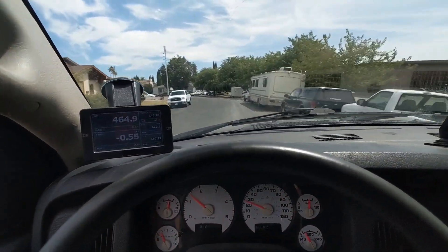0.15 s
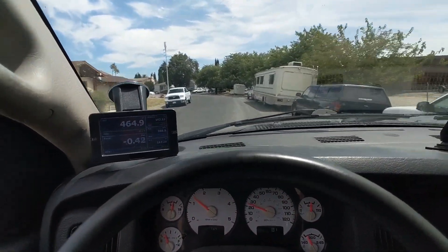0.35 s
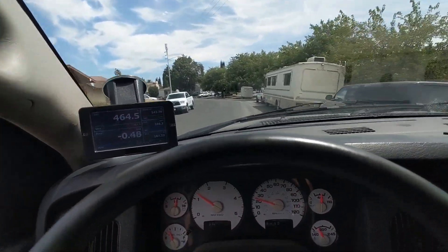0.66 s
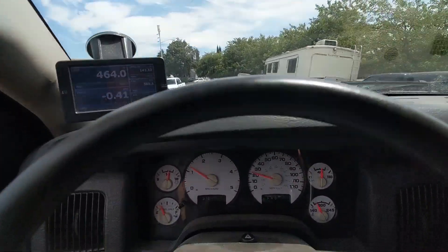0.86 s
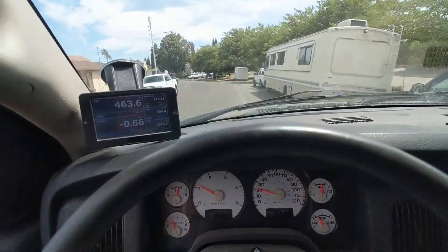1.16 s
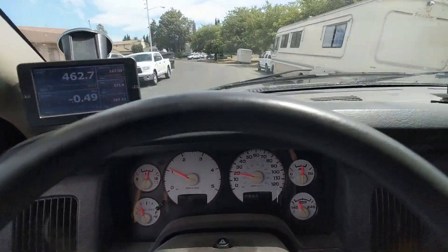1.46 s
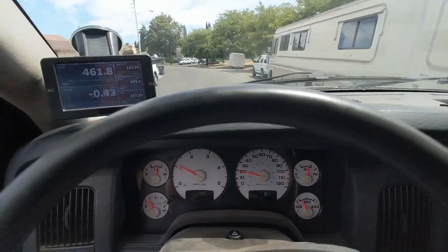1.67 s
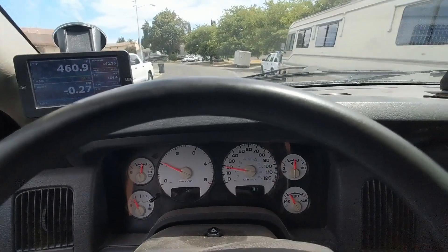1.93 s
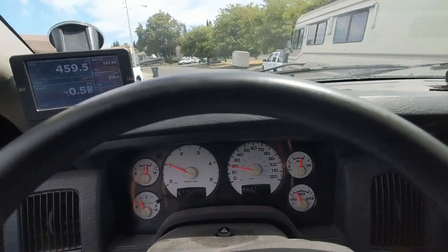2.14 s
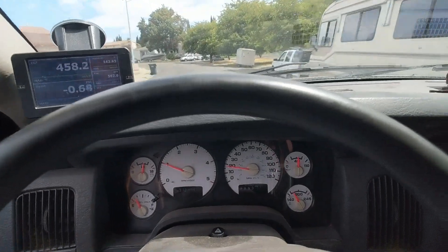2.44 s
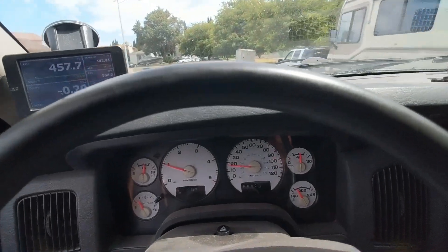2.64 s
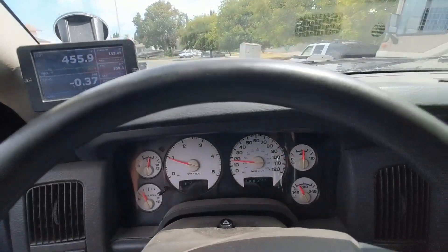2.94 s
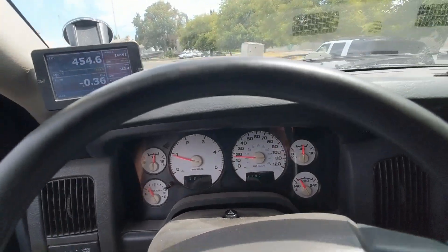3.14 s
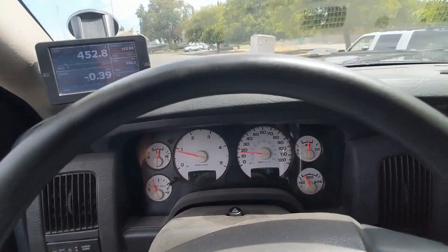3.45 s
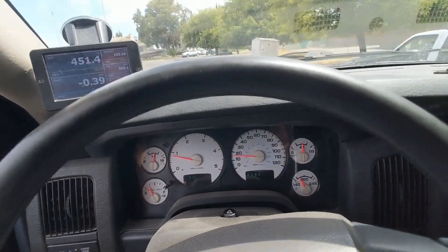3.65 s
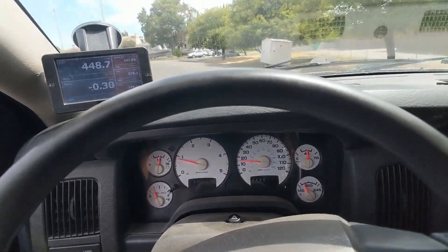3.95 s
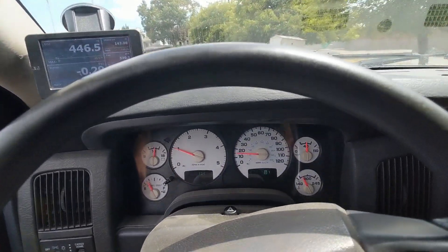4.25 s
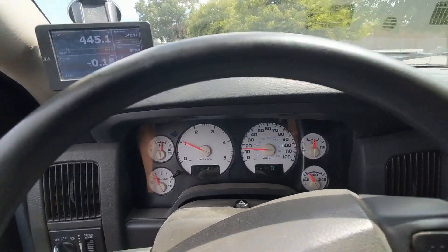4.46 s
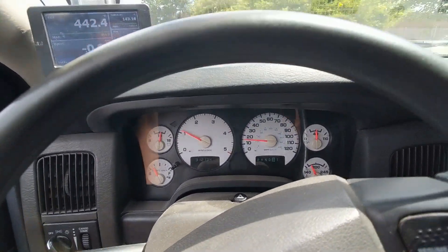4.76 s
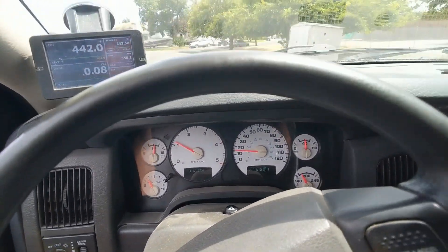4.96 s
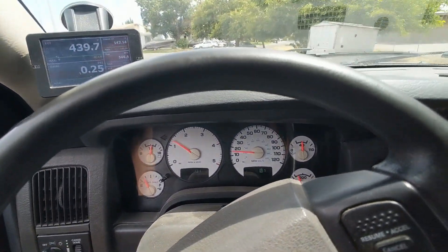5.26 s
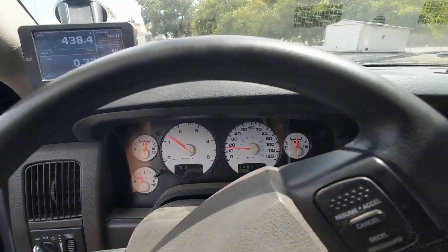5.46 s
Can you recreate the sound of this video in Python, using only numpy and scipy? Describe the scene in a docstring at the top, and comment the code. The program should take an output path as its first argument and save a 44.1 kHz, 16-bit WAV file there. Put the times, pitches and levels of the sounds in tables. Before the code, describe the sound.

A turbodiesel truck heard from the cab slows with a throbbing drone and dashboard ticks, puffs air, then pulls away louder as revs climb.

```python
"""Inside the cab of a six-cylinder turbodiesel pickup rolling down a street. First the exhaust brake
drones and throbs as the revs fall, over injection clatter, duct hiss and tyre rumble. The trim ticks
and knocks; bumps jolt the cab. Near 3 s the brake flap opens with a hiss of trapped gas. From 3.5 s
the revs climb: the turbo whistle rises and the firing note booms in the cab."""
import sys
import numpy as np
from scipy import signal
from scipy.fft import rfft, irfft, next_fast_len
from scipy.io import wavfile
from scipy.ndimage import uniform_filter1d, map_coordinates

SR = 44100
rng = np.random.default_rng(int(sys.argv[2]) if len(sys.argv) > 2 else 0)


def store_pcm(level_fs):
    """Save levels as 16-bit WAV."""
    pcm = np.round(np.clip(level_fs, -1, 1) * 32767).astype(np.int16)
    wavfile.write(sys.argv[1], SR, np.atleast_2d(pcm).T)


N = 246959

# engine speed: time_s, firing_hz
FIRING_RATE = [(0, 68), (.9, 60.2), (1.5, 54.5), (2.1, 51.6), (2.7, 47.2), (3, 45.8), (3.5, 40.5),
               (3.75, 41.9), (4, 44.8), (4.25, 51.9), (4.75, 57.8), (5.25, 65.1), (5.6, 68.3)]
# throttle: time_s, fuel_share
THROTTLE = [(2.7, 0.069), (3.2, 0.32), (3.65, .66), (4.4, 0.95), (4.8, 0.95), (5.2, 0.48), (5.6, 0.39)]
# pulses in firing order; the shut flap loads the manifold halves unevenly: relative_strength
BRAKE_PULSES = [1, .03, .72, .08, .72, 0]
BUZZ_PULSES = [0.14, -0.66, 0.39, 0.2, 0.51, -0.59]
PULL_PULSES = [0.4, 0.47, 0.79, 0.42, 1.1, 0.37]
# pipe and cab response, flap shut and open: freq_hz, gain_db
PIPE_SHUT = [(30, -50), (65, -34), (100, -22), (128, -17), (144, -7.5), (157, -2.5), (170, 1), (184, 1.5),
             (199, -5), (213, -15), (245, -27), (400, -52)]
PIPE_OPEN = [(30, -25), (60, -11), (90, -7), (125, -11), (150, -.5), (175, 2), (215, -1.5), (245, -11),
             (270, -11), (305, -17), (380, -26), (600, -47)]
# flap response: freq_hz, gain_db
FLAP_RESPONSE = [(200, -32), (245, -15.5), (275, -1.5), (298, 2.5), (322, 0), (345, -13), (390, -20),
                 (520, -35.5)]
# cab boom, flap shut and open: freq_hz, level_db
BOOM_SHUT = [(50, -49), (57, -34.5), (61, -23), (63.5, -22.5), (66, -35), (92, -30.5), (104, -53),
             (124, -55), (135, -32.5)]
BOOM_OPEN = [(44, -44), (52, -26.5), (58, -18), (64, -9.5), (68, -9), (80, -31.5), (88, -22.5),
             (102, -21.5), (118, -32.5), (135, -27.5)]
# glass and roof reflections: delay_s, gain
CAB_ECHOES = [(.0029, .13), (.0047, -.12), (.0074, .12), (.0113, .1)]
# noise spectra: freq_hz, gain_db
COMBUSTION_SPECTRUM = [(220, -23.5), (380, -1), (465, -6.5), (585, -0.5), (625, -3), (706, -5), (760, -1),
                       (924, -4.5), (1000, -4.5), (1110, -2.5), (1230, -4.5), (1510, -9.5), (1900, -17.5),
                       (2470, -33), (4180, -120)]
INJECTOR_SPECTRUM = [(940, -16.5), (1600, -1.5), (1890, -6.5), (2060, -2.5), (2400, -4.5), (2770, -2),
                     (3280, -9.5), (3800, -10.5), (4760, -13), (5600, -34), (7280, -47), (12300, -120)]
DUCT_SPECTRUM = [(2820, -8.5), (4800, -1.5), (5540, -3), (7700, -4.5), (8670, -8), (10100, -7.5),
                 (11300, -15), (15100, -21), (15600, -20)]
TYRE_SPECTRUM = [(20, -46.5), (42, -7.5), (70, 0), (120, -8), (180, -0.5), (250, -10.5), (330, -22.5),
                 (450, -26), (800, -45.5)]
# duct hiss contour: time_s, relative_db
DUCT_CONTOUR = [(0.0, -53), (0.69, -55.5), (1.0, -51), (2.51, -55), (2.92, -46), (3.02, -46), (3.21, -53),
                (3.52, -51.5), (3.76, -49), (4.85, -51.5), (5.08, -54.5), (5.6, -54.5)]
# road bumps: peak_s, level_db, half_width_s
BUMPS = [(1.08, -27, .06), (1.43, -19.5, .055), (1.6, -27, .1)]
# plastic squeaks: start_s, level_db, pitch_hz
SQUEAKS = [(.315, -50, 12000), (.803, -45, 12150), (1.097, -40, 8300), (2.182, -48, 11200)]
# dashboard ticks and creaks: start_s, level_db, centre_hz, t60_s
DASH_TICKS = [(0.408, -33.5, 880, 0.072), (.975, -33, 2020, 0.17), (0.985, -38.5, 6900, 0.059),
              (1.055, -29, 800, .3), (1.39, -27.5, 560, .16), (1.57, -45, 6900, 0.28),
              (1.69, -40, 6700, .12), (1.812, -42, 10000, 0.046), (2.238, -39, 7500, 0.027),
              (2.52, -35.5, 2470, .09), (2.78, -34.5, 616, .4), (3.207, -39, 7500, 0.067),
              (3.467, -33.5, 4960, .04), (4.12, -41, 8450, .4)]
# panel knocks: start_s, gain_db
PANEL_KNOCKS = [(.806, -36.5), (.99, -35), (1.005, -35), (1.122, -37), (1.534, -32.5), (2.1238, -21)]
# panel modes: pitch_hz, gain_db, t60_s
PANEL_MODES = [(694, 1, 0.056), (767, 2, .04), (866, -1, 0.056), (1476, -2, 0.026), (1710, -2.5, 0.035),
               (2340, -6.5, 0.041), (2590, -12, 0.049), (3190, -6.5, 0.028), (4000, -8, 0.027),
               (7090, -14, 0.031)]
# gas past the flap (jet, whistling edge, gush): start_s, hold_s, level_db, centre_hz, width_hz
GAS_PUFFS = [(2.828, .15, -44, 6300, 8000), (2.83, .33, -44.5, 6300, 1600),
             (2.955, .035, -35.5, 2920, 3020)]

FLAP_OPENS_S, FLAP_SWING_S = 2.985, .04
CRUISE_FIRING_HZ = 55
TIME_S = np.arange(N) / SR
LN_1000 = np.log(1000)  # 60 dB of decay


def amp(db):
    """Decibels to gain."""
    return 10 ** (np.asarray(db) / 20)


def unit(x):
    """x at rms 1."""
    return x / np.sqrt(np.mean(x ** 2) + 1e-20)


def curve(rows):
    """(time_s, value) rows to one value per sample."""
    return np.interp(TIME_S, *np.transpose(rows))


def wobble(rate_hz):
    """Smooth random curve with knots at rate_hz."""
    return map_coordinates(rng.standard_normal(int(N * rate_hz / SR) + 4), [TIME_S * rate_hz])


def filtered(x, response):
    """x times a complex frequency response."""
    size = 2 * next_fast_len(N // 2 + SR // 4)
    return irfft(rfft(x, size) * response(np.fft.rfftfreq(size, 1 / SR)), size)[:N]


def coloured(x, spectrum):
    """Causal filter, falling 40 dB per octave beyond the spectrum's ends; rms 1."""
    def response(hz):
        knot_hz, gain_db = np.transpose(spectrum)
        octave, knots = np.log2(hz + 1), np.log2(knot_hz)
        beyond = np.abs(octave - np.clip(octave, knots[0], knots[-1]))
        gain = amp(np.interp(octave, knots, gain_db) - 40 * beyond)
        cepstrum = irfft(np.log(gain + 1e-6))
        return np.exp(rfft(2 * cepstrum[:len(cepstrum) // 2], len(cepstrum)))
    return unit(filtered(x, response))


def noise(spectrum):
    """Coloured noise, rms 1."""
    return coloured(rng.standard_normal(N), spectrum)


def band(centre_hz, width_hz):
    """Noise through a damped mode twice, rms 1."""
    def mode(hz):
        return 1j * hz * width_hz / (centre_hz ** 2 - hz ** 2 + 1j * hz * width_hz)
    return unit(filtered(rng.standard_normal(N), lambda hz: mode(hz) ** 2))


def burst(start_s, rise_s, t60_s):
    """Envelope that swells and dies away."""
    age_s = np.arange(SR // 2) / SR
    shape = (1 - np.exp(-age_s / rise_s)) * np.exp(-LN_1000 * age_s / t60_s)
    return np.pad(shape, (int(start_s * SR), N))[:N]


def level(base_db, fuel_db=0, octave_db=0):
    """Gain: base_db unfuelled at cruise, plus fuel_db at full throttle, octave_db per rev doubling."""
    octaves = np.log2(curve(FIRING_RATE) / CRUISE_FIRING_HZ)
    return amp(base_db + fuel_db * curve(THROTTLE) + octave_db * octaves)


def cab(x):
    """Close reflections add a boxed-in colour; rms 1."""
    def response(hz):
        return 1 + sum(gain * np.exp(-2j * np.pi * hz * delay_s) for delay_s, gain in CAB_ECHOES)
    return unit(filtered(x, response))


def exhaust(firings, pulses, response, scatter, jitter):
    """One gas pulse per firing, varied in size and timing, rings the response; level held steady."""
    index = np.arange(np.ceil(firings[0]), np.floor(firings[-1]))
    chance = rng.standard_normal((len(index), 2))
    sizes = np.array(pulses)[index.astype(int) % len(pulses)] + scatter * chance[:, 0]
    onsets = np.interp(index + jitter * chance[:, 1], firings, np.arange(N)).astype(int)
    ring = coloured(np.bincount(onsets, sizes, N), response)
    power = uniform_filter1d(uniform_filter1d(ring ** 2, size=SR // 4), size=SR // 4)
    return ring / np.sqrt(np.abs(power))


def cab_boom(firings, response):
    """The firing note and its octave swell as the revs cross the cab's resonances."""
    def tone(harmonic):
        level_db = np.interp(harmonic * curve(FIRING_RATE), *np.transpose(response))
        return amp(level_db) * unit(np.cos(2 * np.pi * harmonic * (firings - .3)))
    return amp(.51 * wobble(21)) * tone(1) + amp(2.1 * wobble(13)) * tone(2)


def exhaust_brake(firings, flap_open, bleed_db=-10.5, bleed_s=.32):
    """Uneven pulses drone in the pipe and buzz the flap; once it opens, the drone bleeds away."""
    drone = exhaust(firings, BRAKE_PULSES, PIPE_SHUT, scatter=.05, jitter=.005)
    drone *= level(-18.5, octave_db=4.8)
    buzz = exhaust(firings, BUZZ_PULSES, FLAP_RESPONSE, scatter=.1, jitter=.007)
    buzz *= level(-28.5, octave_db=13)
    braking = drone + buzz + cab_boom(firings, BOOM_SHUT)
    bleed = amp(bleed_db) * np.exp(-((TIME_S - FLAP_OPENS_S) / bleed_s) ** 4)
    return (1 - flap_open) * braking + flap_open * bleed * drone


def clatter(firings, scatter_db=6.5, max_db=13.5, dip_s=2.26, dip_half_width_s=.29, dip_db=-3):
    """Combustion knock and injector rattle flare unevenly at each firing; the level dips briefly."""
    strength_db = np.minimum(scatter_db * rng.standard_normal(int(firings[-1]) + 1), max_db)
    flare = amp(strength_db)[firings.astype(int)] * np.exp(-(firings % 1) / .62)
    combustion = unit(1 + .14 * flare) * cab(noise(COMBUSTION_SPECTRUM))
    injectors = unit(1 + .33 * flare) * cab(noise(INJECTOR_SPECTRUM))
    combustion *= level(-41.5, fuel_db=6.76) * amp(1.1 * wobble(32))
    injectors *= level(-47, fuel_db=7.4, octave_db=-6.5)
    dip = amp(dip_db * np.exp(-((TIME_S - dip_s) / dip_half_width_s) ** 2))
    return dip * (combustion + injectors)


def duct_hiss(offset_db=2.5):
    """Air hisses through the turbo's ducts."""
    return amp(curve(DUCT_CONTOUR) + offset_db + wobble(25)) * cab(noise(DUCT_SPECTRUM))


def tyres(level_db=-27, swing_db=1.82):
    """Rumble varies with the road surface and swells over bumps."""
    surface = amp(level_db + swing_db * wobble(2.9))
    jolts = sum(amp(db) * np.exp(-((TIME_S - peak_s) / half_width_s) ** 2)
                for peak_s, db, half_width_s in BUMPS)
    return (surface + jolts) * noise(TYRE_SPECTRUM)


def squeaks():
    """Plastic rubs on plastic: thin, fluttering tones."""
    flutter_rad = .8 * wobble(700)
    return sum(amp(db) * burst(start_s, rise_s=.0016, t60_s=.049)
               * np.sin(2 * np.pi * hz * TIME_S + flutter_rad) for start_s, db, hz in SQUEAKS)


def ticks(rise_share=.04, faint_per_s=2.5, faint_db=-40, faint_t60_s=.04):
    """The dashboard ticks and creaks; the shaking cab adds faint ticks at random."""
    dash = sum(amp(db) * burst(start_s, rise_share * t60_s, t60_s) * band(hz, .63 * hz)
               for start_s, db, hz, t60_s in DASH_TICKS)
    faint = amp(faint_db) * band(centre_hz=5500, width_hz=5500)
    chance = rng.random((int(faint_per_s * N / SR), 2))
    envelope = sum(size * burst(position * N / SR, rise_share * faint_t60_s, faint_t60_s)
                   for position, size in chance)
    return dash + envelope * faint


def panel_knock(start_s, rise_s=.00075):
    """A loose panel strikes its mount: short modes and a dry crack."""
    age_s = np.arange(SR // 4) / SR
    modes = sum(amp(db + rng.normal(0, 1)) * np.exp(-LN_1000 * age_s / t60_s)
                * np.sin(2 * np.pi * (hz * age_s + rng.random())) for hz, db, t60_s in PANEL_MODES)
    ring = np.pad((1 - np.exp(-age_s / rise_s)) * modes, (int(start_s * SR), N))[:N]
    crack = burst(start_s - .001, rise_s=.0026, t60_s=.036) * band(centre_hz=3600, width_hz=6100)
    return ring + amp(-4) * crack


def gas_release(attack_s=.016, t60_s=.27):
    """Pressure trapped behind the flap blows off: a thin jet, then a fuller gush."""
    gas = np.zeros(N)
    for start_s, hold_s, level_db, centre_hz, width_hz in GAS_PUFFS:
        age_s = TIME_S - start_s
        attack = np.clip(age_s / attack_s, 0, 1)
        decay = np.exp(-LN_1000 * np.maximum(age_s - hold_s, 0) / t60_s)
        gas += amp(level_db) * attack * decay * band(centre_hz, width_hz)
    return gas


def engine_pull(firings, lag_s_per_hz=8e-5, full_boom_throttle=.52):
    """Smoother pulses ring the open pipe; the cab booms under load."""
    pulses = exhaust(firings, PULL_PULSES, PIPE_OPEN, scatter=.07, jitter=.006)
    # pipe and body delay higher tones more
    smeared = filtered(pulses, lambda hz: np.exp(-1j * np.pi * lag_s_per_hz * np.minimum(hz, 700) ** 2))
    load = np.clip(curve(THROTTLE) / full_boom_throttle, 0, 1) ** 2
    return level(-37, fuel_db=17.6, octave_db=16.5) * smeared + load * cab_boom(firings, BOOM_OPEN)


def accessory_hum(firings, cycles_per_turn=13):
    """A crank-driven accessory hums under load."""
    crank_turns = firings / 3
    tone = unit(np.sin(2 * np.pi * cycles_per_turn * crank_turns))
    return level(-52, fuel_db=21, octave_db=13.5) * amp(.52 * wobble(12)) * tone


def turbo_whistle(rest_hz=4316.5, rise_hz=1115.5, spool_s=1.8, upper_db=-1.5, upper_fade_db=15):
    """Boost lags the throttle, raising a breathy whistle's pitch and fading its upper band."""
    step = 1 / (spool_s * SR)
    boost = signal.lfilter([step], [1, step - 1], curve(THROTTLE))
    cycles = np.cumsum(rest_hz + rise_hz * boost) / SR

    def whistle(ratio, width_hz):
        breath = wobble(width_hz) + 1j * wobble(width_hz)
        return unit(np.real(breath * np.exp(2j * np.pi * ratio * cycles)))
    gain = level(-56, fuel_db=7.2, octave_db=2) * amp(1.9 * wobble(25))
    upper_gain = amp(upper_db - upper_fade_db * boost)
    return gain * (whistle(1, width_hz=400) + upper_gain * whistle(1.6495, width_hz=1300))


def scene():
    """Mono mix at the driver's seat."""
    firings = 1.95 + np.cumsum(curve(FIRING_RATE)) / SR  # running count, starting mid-cycle
    flap_open = np.clip((TIME_S - FLAP_OPENS_S) / FLAP_SWING_S, 0, 1)
    mix = exhaust_brake(firings, flap_open) + clatter(firings) + duct_hiss() + tyres()
    mix += squeaks() + ticks()
    mix += sum(amp(db) * panel_knock(start_s) for start_s, db in PANEL_KNOCKS)
    mix += gas_release()
    mix += flap_open * (engine_pull(firings) + accessory_hum(firings) + turbo_whistle())
    return mix[None]


def record(dry, cutoff_hz=15730):
    """Brick-wall low-pass."""
    return np.array([filtered(x, lambda hz: hz < cutoff_hz) for x in dry])


dry = scene()
out = record(dry)
store_pcm(out)
```